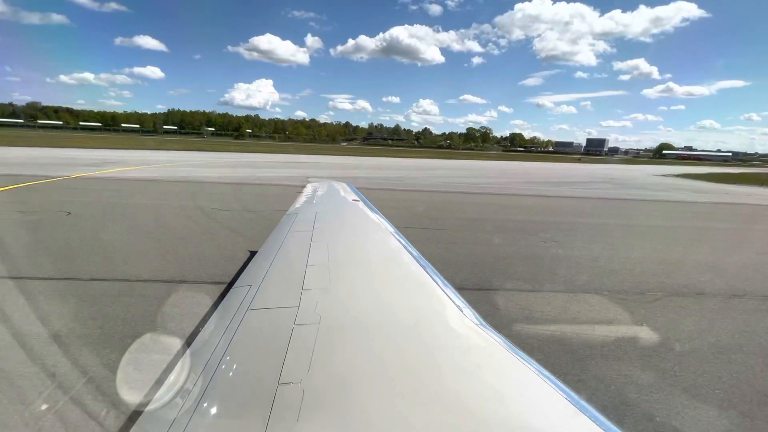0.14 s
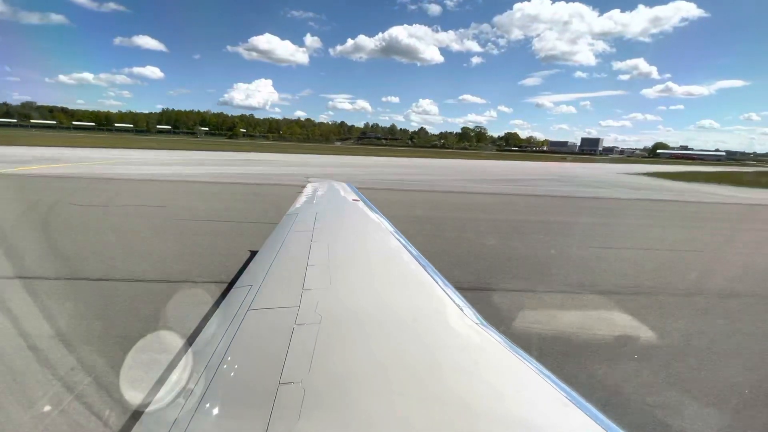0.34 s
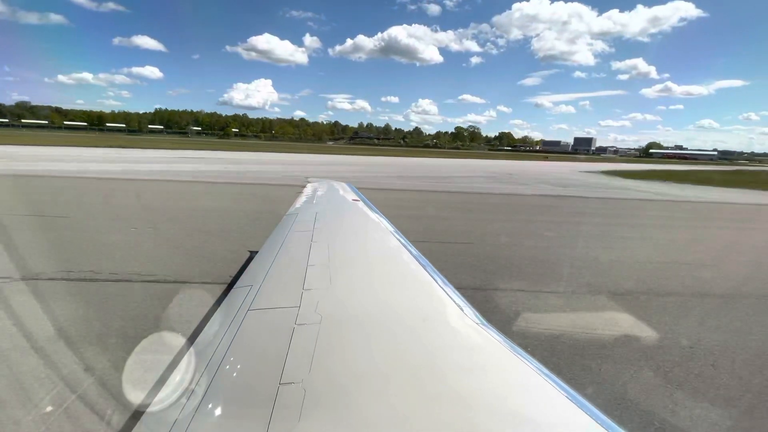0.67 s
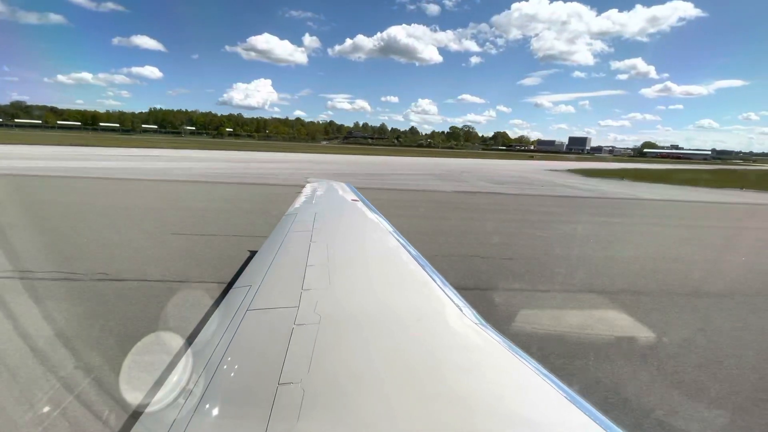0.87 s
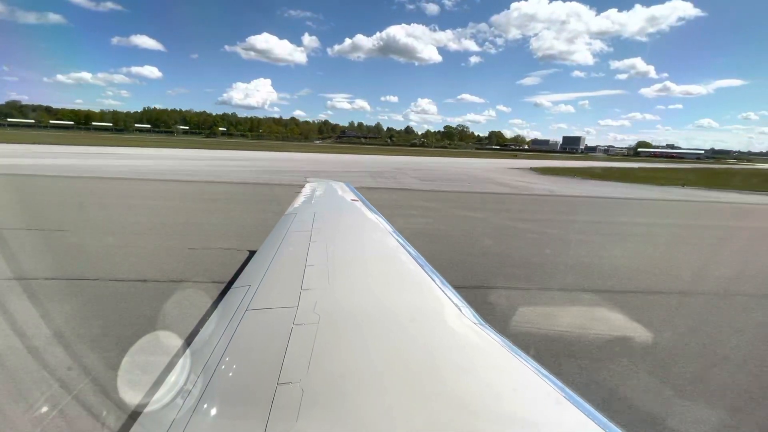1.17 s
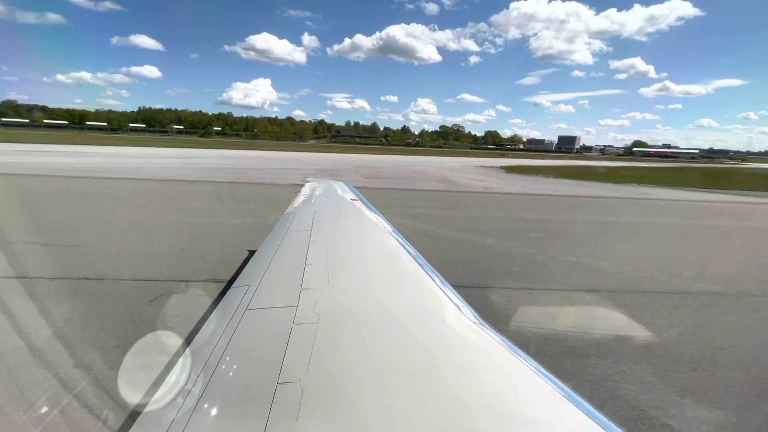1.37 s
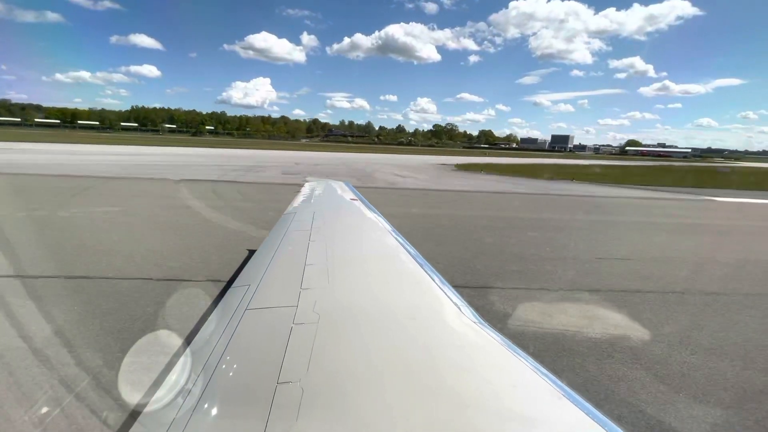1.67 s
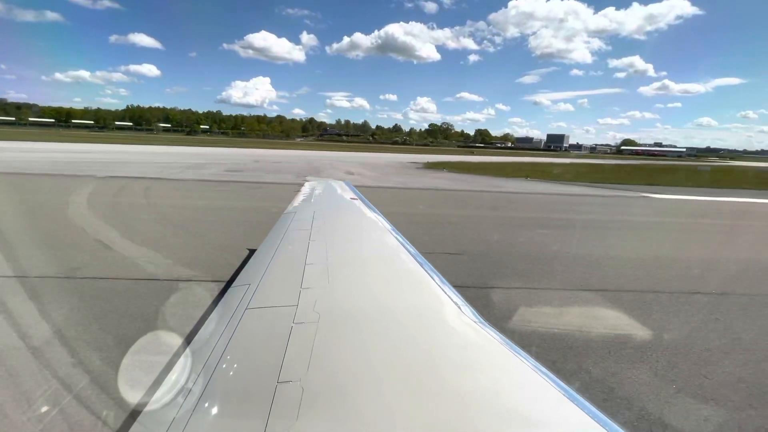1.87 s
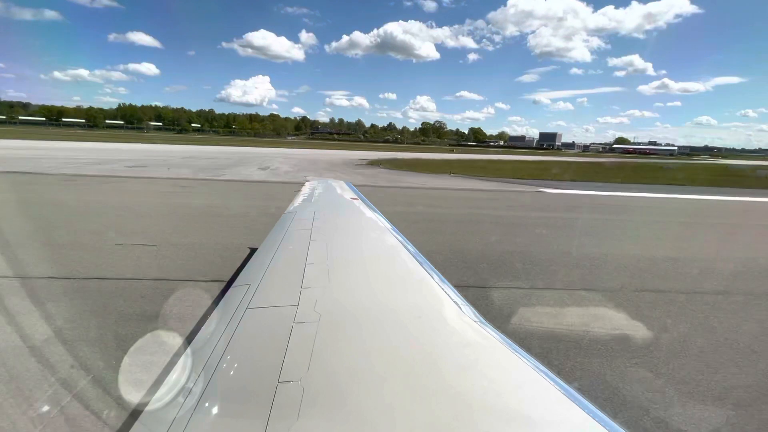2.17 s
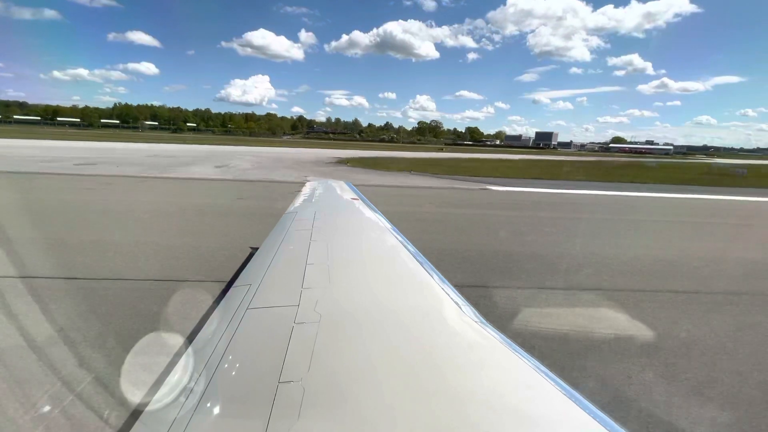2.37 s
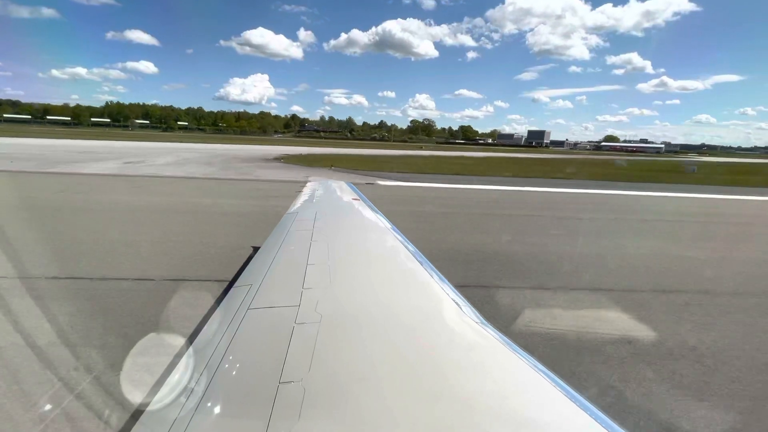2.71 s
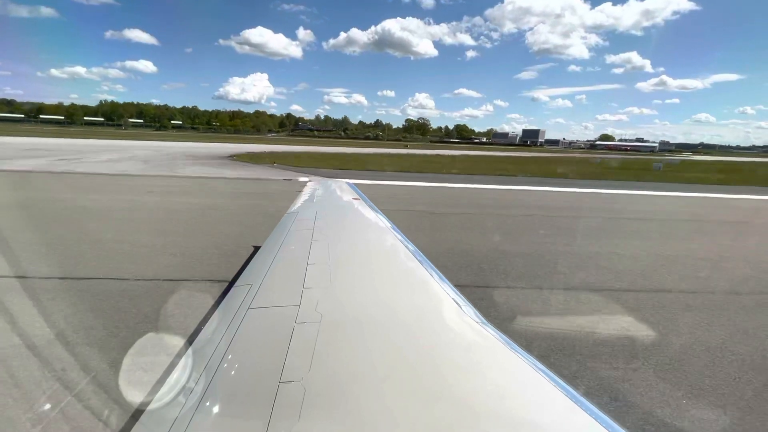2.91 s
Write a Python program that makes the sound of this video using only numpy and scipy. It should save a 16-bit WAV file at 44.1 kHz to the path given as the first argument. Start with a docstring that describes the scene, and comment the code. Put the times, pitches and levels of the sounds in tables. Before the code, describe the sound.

Steady low rumble of a rolling jet from inside, with engine hum and soft wheel knocks.

```python
"""Small jet rolling along a runway

From a window seat, the wheels rumble and knock over joints, and the cabin booms and drums.
The idling engines hum, and their whines sink slowly as they wind down. Air hisses from the
vents, and a loose piece of cabin trim ticks and rubs now and then on the left."""
import sys
import numpy as np
from scipy import signal
from scipy.fft import rfft, irfft, next_fast_len
from scipy.io import wavfile
from scipy.ndimage import uniform_filter1d, minimum_filter1d, map_coordinates

SR = 44100
rng = np.random.default_rng(int(sys.argv[2]) if len(sys.argv) > 2 else 0)


def generate_wav(sig):
    """Save sig (samples, or channels by samples) to the path in sys.argv[1] as 16-bit PCM at SR."""
    pcm = np.round(np.clip(np.atleast_2d(sig).T, -1, 1) * 32767).astype(np.int16)
    wavfile.write(sys.argv[1], SR, pcm)


N = 134505

# The trim panel: its ring time (T60 is the time to fade by 60 dB) and its level in the right channel.
TRIM_T60_S, TRIM_RIGHT_DB = .02, -9


def amp(db):
    """Turn decibels into a gain to multiply by."""
    return 10 ** (np.asarray(db) / 20)


def unit(x):
    """Scale a signal to an average power of 1."""
    return x / np.sqrt(np.mean(np.abs(x) ** 2) + 1e-20)


def along(points, hz):
    """Read between the rows of a (frequency, value) table, with octaves evenly spaced."""
    f, v = np.transpose(points)
    return np.interp(np.log(hz + 1), np.log(f + 1), v)


def wobble(rate):
    """A smooth curve through `rate` random points a second."""
    knots = rng.standard_normal(1024)
    coarse = np.arange(0, N + 64, 64)
    curve = map_coordinates(knots, [coarse * rate / SR + 2], mode="wrap")
    return unit(np.interp(np.arange(N), coarse, curve))


def filtered(x, response):
    """Multiply each frequency in x by the gain response(hz)."""
    size = next_fast_len(N + SR // 4)
    hz = np.fft.rfftfreq(size, 1 / SR)
    return irfft(rfft(x, size) * response(hz), size)[..., :N]


def cabin_noise(spectrum):
    """Stereo noise with the given spectrum: alike in the bass, mostly louder and earlier on the left."""
    # How alike the two sides are: f/Hz, likeness (1 = the same)
    likeness = [(40, .995), (80, 1), (130, 0.9), (250, 0.98), (350, 0.21), (450, 0.43), (750, 0.21),
                (1000, 0.16), (1250, 0.23), (1800, 0.59), (2300, 0.38), (2850, .5), (3500, 0.27),
                (5500, 0.23), (8000, 0.31), (9200, 0.63)]
    # How much louder the left side is: f/Hz, level/dB
    balance = [(60, 4.5), (110, -0.2), (160, 2.5), (260, 8), (400, 3), (600, 4), (700, 2), (1000, 4.5),
               (1500, 4), (2100, 1), (3000, 6), (3700, 10.5), (4400, 4), (5000, 14), (7500, 11), (8500, -2),
               (9300, 1)]
    # How far the left side's wave runs ahead: f/Hz, phase/rad
    lead = [(100, 0), (150, 0.32), (250, 0), (340, 1.85), (600, 2), (800, 3.5), (1800, 3.5), (2200, 6.5),
            (3000, 9.5), (4400, 10.5), (8500, 14.5), (9600, 2.5)]
    spread = lambda hz: np.arccos(np.clip(along(likeness, hz), -1, 1)) / 2
    colour = lambda hz: amp(along(spectrum, hz)) * [np.cos(spread(hz)), np.sin(spread(hz))]
    white = rng.standard_normal((2, N)) * np.sqrt(SR / 2)
    mid, side = filtered(white, colour)
    half = np.array([[.5], [-.5]])
    placement = lambda hz: amp(half * along(balance, hz)) * np.exp(1j * half * along(lead, hz))
    return filtered(np.array([mid + side, mid - side]), placement)


def wheels():
    """Rolling wheels shake the cabin: it rumbles, drums and booms, and the tyres roar on rough ground."""
    # Wheel rumble through the plane's body: f/Hz, level/dB per Hz
    rumble_spectrum = [(15, -73), (33, -57), (43, -38), (56, -43), (80, -40), (100, -38), (140, -61.5),
                       (400, -110)]
    # Drumming of the floor and wall panels: f/Hz, level/dB per Hz
    drum_spectrum = [(50, -76.5), (100, -41.5), (128, -36.5), (165, -38), (200, -46), (222, -43),
                     (248, -48.5), (264, -44.5), (312, -55.5), (356, -47.5), (400, -62.5), (600, -67),
                     (1200, -110)]
    # How the drumming rises and falls: t/s, gain/dB
    drum_levels = [(0, -1.5), (.14, -1), (.3, 1.5), (.65, -.5), (1.0, 2), (1.2, 0.6), (1.6, 1.5), (2.1, -1),
                   (2.32, 1.5), (2.5, -0.5), (2.87, 1.3), (3.05, 0)]
    # Strength of the cabin's lowest strong resonance: t/s, level/dB
    boom_levels = [(0, -16.5), (.4, -20.5), (.57, -16.5), (1.0, -21.5), (1.12, -18), (1.75, -23),
                   (1.87, -15), (2.2, -30.5), (2.5, -14.5), (2.65, -26), (2.87, -17.5), (3.05, -14)]
    # Tyre roar: f/Hz, level/dB per Hz
    roar_spectrum = [(200, -60), (400, -55.5), (520, -55), (600, -52), (680, -52), (760, -56), (810, -58),
                     (1000, -60.5), (1200, -72), (1600, -69), (2500, -92), (5000, -115)]
    # Rough patches of pavement that swell the roar: t/s, rise/dB, half length/s
    patches = [(0.078, 2, 0.12), (0.29, 1.5, 0.056), (0.628, 1.2, 0.049), (1.005, 4.5, 0.045),
               (1.098, 4, 0.019), (1.452, 3, 0.063), (1.86, 4, 0.022), (2.166, 4, 0.027)]
    boom_hz, boom_width_hz = 68.3, 5
    roar_gain_db, roar_fade_db_per_s = .5, .84
    t = np.arange(N) / SR
    gain = lambda curve: amp(np.interp(t, *np.transpose(curve)))
    rough_db = sum(db * np.exp(-((t - s) / length) ** 2) for s, db, length in patches)
    roar = cabin_noise(roar_spectrum) * amp(roar_gain_db + rough_db - roar_fade_db_per_s * t)
    sway = wobble(2 * boom_width_hz) + 1j * wobble(2 * boom_width_hz)  # wanders in level and phase
    sway = sway / np.sqrt(.2 + np.abs(sway) ** 2)  # evens out the level
    boom = gain(boom_levels) * unit(np.real(sway * np.exp(2j * np.pi * boom_hz * t)))
    rumble = cabin_noise(rumble_spectrum)
    drumming = gain(drum_levels) * cabin_noise(drum_spectrum)
    return rumble + drumming + boom + roar


def shaft_tone(hz, left_db, right_db, lead, share, speed, flutter_hz, apart):
    """A tone that follows a shaft's speed; `share` of it flutters, and `apart` makes the sides differ."""
    flutter = lambda: unit(wobble(flutter_hz) + 1j * wobble(flutter_hz))
    steady = np.exp(2j * np.pi * (hz * np.cumsum(speed) / SR + rng.random()))
    common = np.sqrt(1 - share ** 2) + share * flutter()
    sides = []
    for db, phase in [(left_db, lead), (right_db, 0)]:
        sway = common + apart * share * flutter()
        sides.append(amp(db) * unit(np.real(sway * steady * np.exp(1j * phase))))
    return np.array(sides)


def engines():
    """Two idling engines hum, and their whines sink as the spinning shafts slow down."""
    # Engine and fan hum, before its overall gain:
    # f/Hz, left level/dB, right level/dB, left lead/rad, fluttering share (0-1)
    hums = [(333.6, -25.2, -36, 1.7, .17), (909, -40.3, -50, -1.4, .35), (1069, -49.5, -54, -.9, .9),
            (1235, -48, -49, -2.8, .9), (1400, -49.5, -58, -2.9, .9), (1543, -51, -55, -2.7, .9),
            (1818, -56, -59, -2.4, .9), (1998, -64, -65, 0, .9), (2244, -56.5, -60.5, .6, .35),
            (2667, -67, -68, 1.8, .9), (8001, -69, -77, 2.9, .4)]
    # Whines of the slowing shafts: settled f/Hz, left level/dB, right level/dB, left lead/rad,
    # fluttering share (0-1), loudest at t/s, fall on either side/dB per s, engine (0 or 1)
    whines = [(3115.5, -54.6, -57.6, .3, .1, 1.18, 3.2, 0), (3136, -62.5, -65.5, .3, .1, 1.9, 1.5, 1),
              (3500, -67, -76, 0, .9, 2, 1, 0), (3975, -63, -73.5, -.9, .3, 1.6, 4.5, 0),
              (4172, -63, -69.5, .3, .25, .6, .5, 0), (5040, -68, -75, 0, .6, 2.4, 6, 0),
              (5238, -61.5, -72, -1.8, .5, .2, 4, 0), (8345, -69.5, -72, 1.5, .3, .4, 4, 0),
              (9008, -66, -66, -.8, .55, 2.6, 2, 0), (9020, -72, -72, -.8, .5, .7, 4, 1),
              (9410, -72, -72, -2.6, .5, .7, 2, 0)]
    hum_gain_db = 3.5
    extra_speed, settle_s = (.018, .0135), 1.7  # each engine starts this fraction above its settled speed
    t = np.arange(N) / SR
    hum = sum(shaft_tone(*row, speed=np.ones(N), flutter_hz=11, apart=.29) for row in hums)
    whine = np.zeros((2, N))
    for *row, loudest_s, fall, engine in whines:
        speed = 1 + extra_speed[engine] * np.exp(-t / settle_s)
        swell = unit(amp(-fall * np.abs(t - loudest_s)))
        whine += swell * shaft_tone(*row, speed, flutter_hz=24.24, apart=.2)
    return amp(hum_gain_db) * hum + whine


def air():
    """Air from the engines and vents makes a smooth hiss that barely wavers."""
    # Rushing air: f/Hz, level/dB per Hz
    spectrum = [(300, -104), (900, -64), (1500, -69.5), (2000, -74), (2500, -78), (3000, -85), (3500, -84),
                (3900, -85.5), (4400, -92.5), (4900, -91), (5300, -91.5), (5700, -93.5), (7500, -95.5),
                (12000, -84.5)]
    waver_db = .29
    return cabin_noise(spectrum) * amp(waver_db * wobble(rate=7))


def joints():
    """Joints in the pavement knock through the landing gear: a dull clack and a low thump."""
    # Wheels hitting joints: t/s, clack level/dB, thump level/dB
    hits = [(.097, -12, -26), (.136, -15.5, -26), (.287, -17.5, -9), (.985, -18, -15), (1.022, -18.5, -13),
            (1.455, -14.5, -22), (1.555, -20, -12), (2.265, -21, -19)]
    # Tone colour of a clack: f/Hz, relative level/dB
    colour = [(250, -12), (500, -2.5), (780, 6.5), (1050, -17.5), (1700, -13.5), (3000, -49.5),
              (6000, -72.5)]
    rise_s, clack_t60_s, thump_t60_s, thump_hz = .0015, .05, .14, 121
    out = np.zeros((2, N))
    knock = unit(cabin_noise(colour))
    for start, clack_db, thump_db in hits:
        age = np.maximum(np.arange(N) / SR - start, 0)
        clack = amp(clack_db - 60 * age / clack_t60_s) * knock
        thump = amp(thump_db - 60 * age / thump_t60_s) * np.sin(2 * np.pi * thump_hz * age)
        out += (1 - np.exp(-age / rise_s)) * (clack + thump)
    return out


def trim_ticks():
    """The trim gives a short bright crack and a weaker bounce, each echoing briefly in the cabin."""
    # Ticks of the panel: t/s, level/dB, rise time/s, bounce relative to the tick/dB
    ticks = [(.1275, -31.5, .0005, -11), (.181, -43, .0007, -15), (.857, -31, .0004, -19),
             (1.4522, -33.3, .0006, -12), (2.4762, -34.5, .001, -7.5)]
    # Tone colour of a tick: f/Hz, relative level/dB
    colour = [(1000, -22), (3000, -7), (3900, -2), (4400, -5), (5050, 2), (5800, -1), (7100, 0), (7450, -3),
              (8100, 1), (8600, -1), (9200, -8), (9700, -10)]
    bounce_s, echo_db, echo_t60_s = .009, -10, .11
    out = np.zeros((2, N))
    crack = unit(filtered(rng.standard_normal((2, N)), lambda hz: amp(along(colour, hz))))
    for s, db, rise_s, bounce_db in ticks:
        for start, level_db in [(s, db), (s + bounce_s, db + bounce_db)]:
            age = np.maximum(np.arange(N) / SR - start, 0)
            attack = 1 - np.exp(-age / rise_s)
            ring = amp(-60 * age / TRIM_T60_S)
            echo = amp(echo_db - 60 * age / echo_t60_s)
            out += amp(level_db) * attack * (ring + echo) * crack
    return out * amp([[0], [TRIM_RIGHT_DB]])


def trim_rubs():
    """The same panel rubs in brief flurries of tiny slips, and each slip makes it ring."""
    # Rubs of the panel: t/s, level/dB, half length/s
    rubs = [(2.17, -54, .018), (2.275, -46.5, .024), (2.34, -57, .04), (2.76, -53, .025)]
    # Tone colour of a rub: f/Hz, relative level/dB
    colour = [(2000, -25), (4400, -8), (5000, -2), (6500, -4), (7000, 0), (7450, -4), (8200, 3), (8800, -8),
              (9700, -14)]
    slips_per_s = 600
    t = np.arange(N) / SR
    slips = (rng.random(N) < slips_per_s / SR) * rng.standard_normal(N)
    age = t[:int(TRIM_T60_S * SR)]
    ring = rng.standard_normal((2, len(age))) * amp(-60 * age / TRIM_T60_S)
    ringing_slips = signal.fftconvolve(slips[None], ring, axes=1)[:, :N]
    scrape = unit(filtered(ringing_slips, lambda hz: amp(along(colour, hz))))
    flurries = sum(amp(db) * np.exp(-((t - s) / length) ** 2) for s, db, length in rubs)
    return scrape * flurries * amp([[0], [TRIM_RIGHT_DB]])


def scene():
    """Everything heard from a window seat."""
    return wheels() + joints() + engines() + air() + trim_ticks() + trim_rubs()


def record(dry):
    """Turn down the loudest peaks and cut off the highest treble."""
    ceiling, smooth_s, top_hz = .9, .01, 9620
    size = int(smooth_s * SR)
    needed_gain = ceiling / np.maximum(np.abs(dry).max(axis=0), ceiling)
    gain = uniform_filter1d(minimum_filter1d(needed_gain, 2 * size), size)
    return filtered(dry * gain, lambda hz: 1 / np.sqrt(1 + (hz / top_hz) ** 240))


dry = scene()
out = record(dry)
generate_wav(out)
```